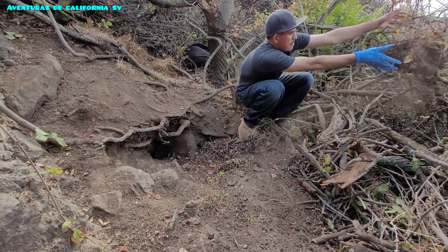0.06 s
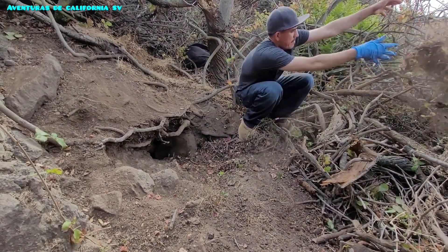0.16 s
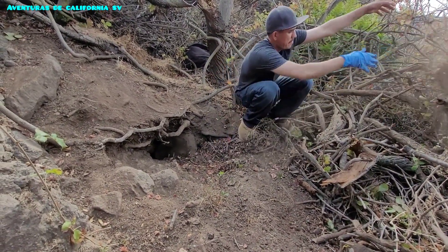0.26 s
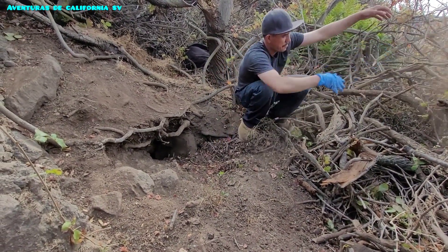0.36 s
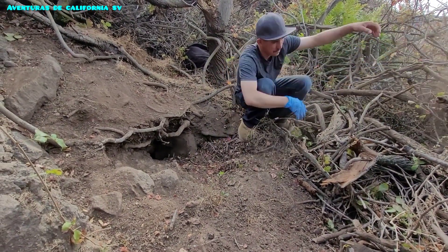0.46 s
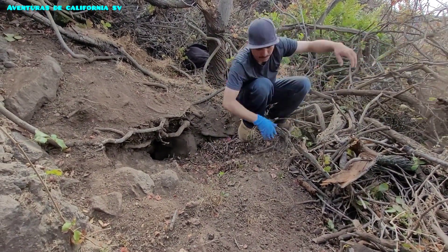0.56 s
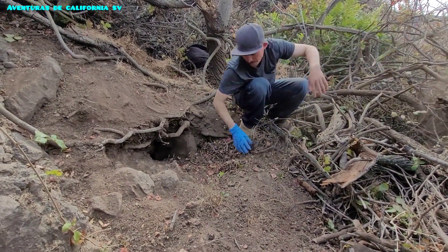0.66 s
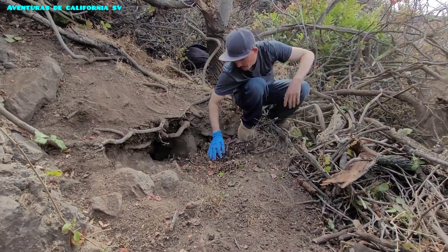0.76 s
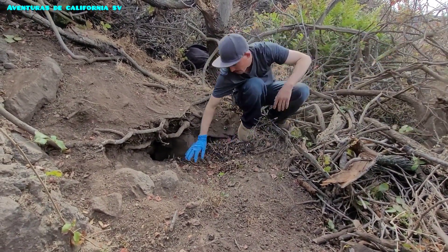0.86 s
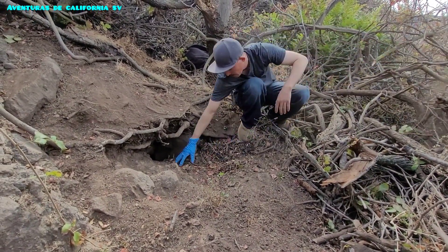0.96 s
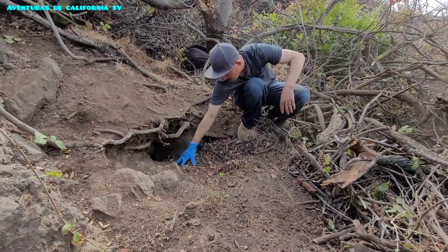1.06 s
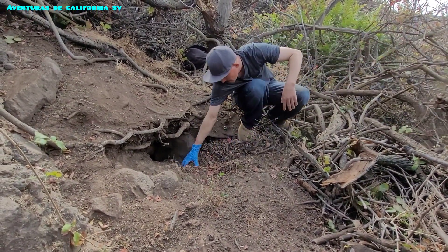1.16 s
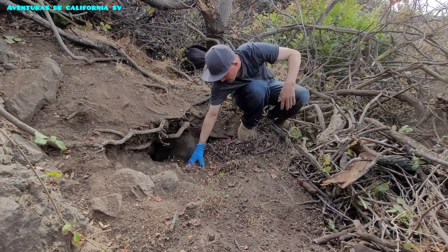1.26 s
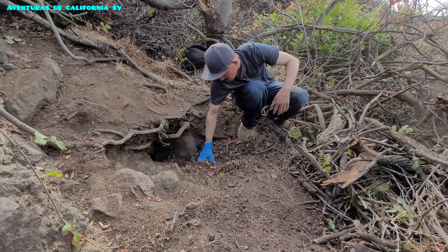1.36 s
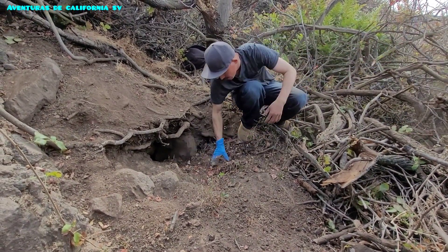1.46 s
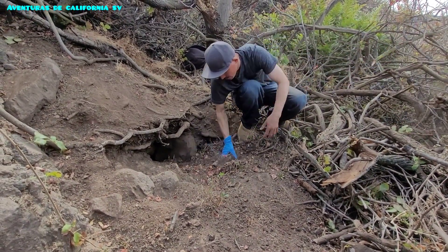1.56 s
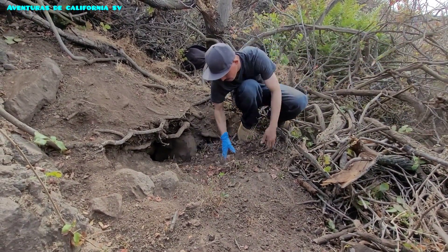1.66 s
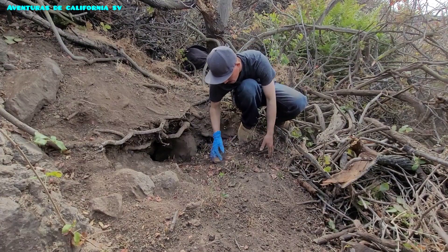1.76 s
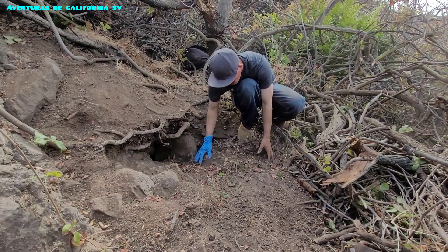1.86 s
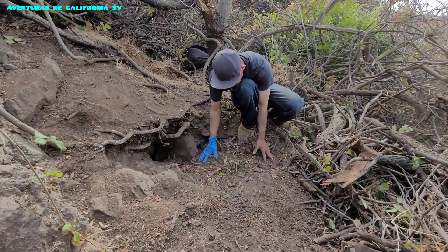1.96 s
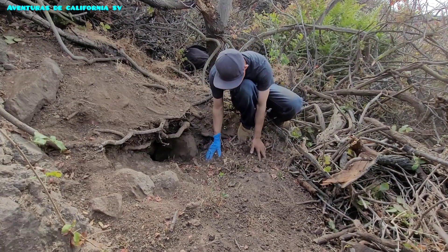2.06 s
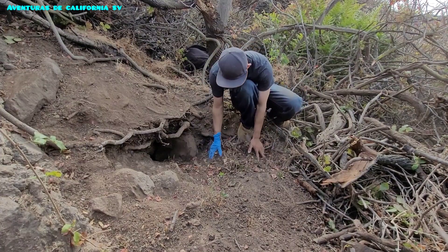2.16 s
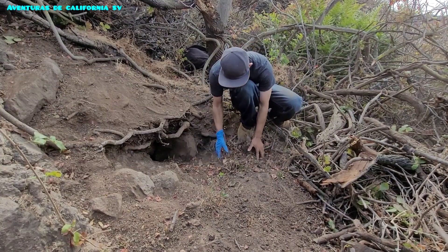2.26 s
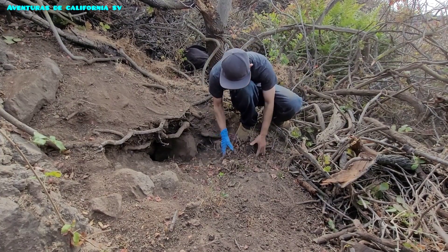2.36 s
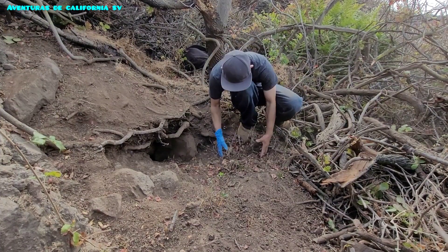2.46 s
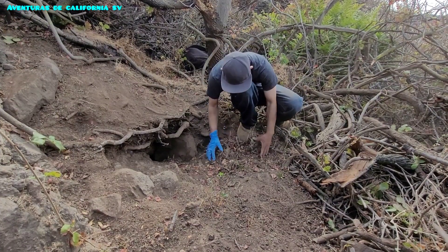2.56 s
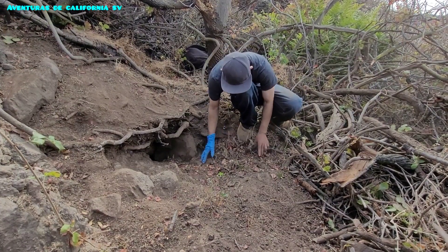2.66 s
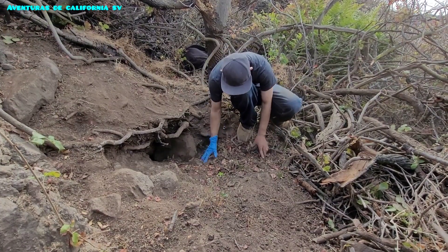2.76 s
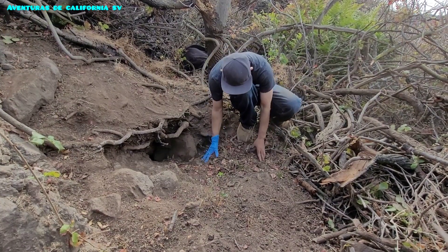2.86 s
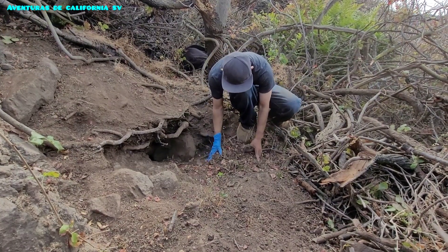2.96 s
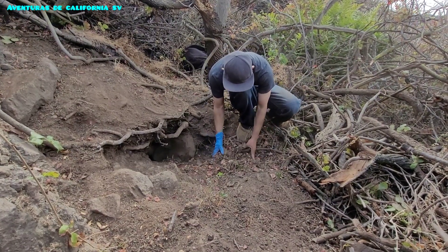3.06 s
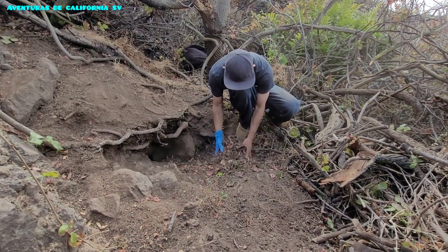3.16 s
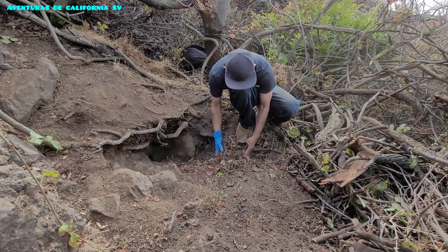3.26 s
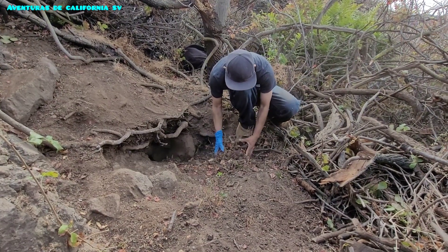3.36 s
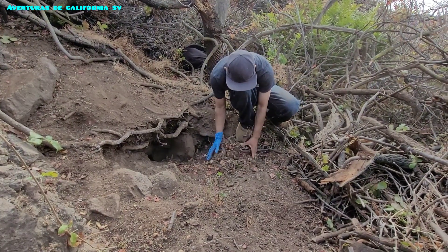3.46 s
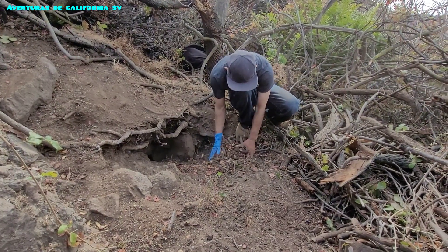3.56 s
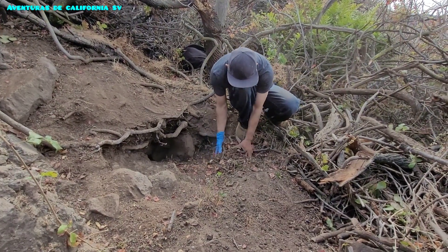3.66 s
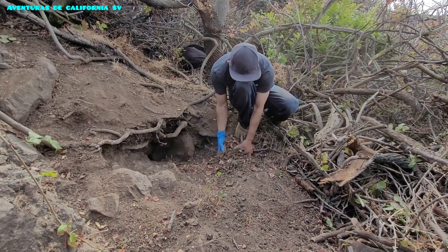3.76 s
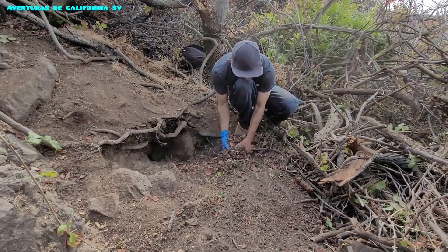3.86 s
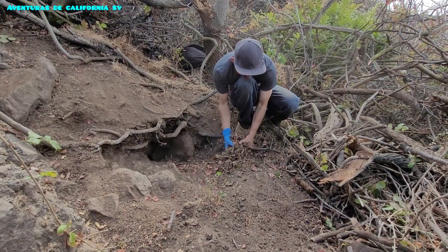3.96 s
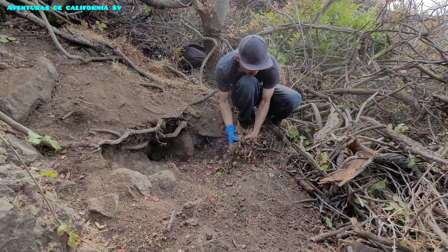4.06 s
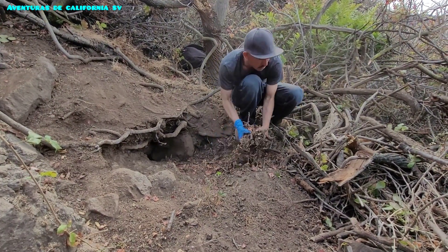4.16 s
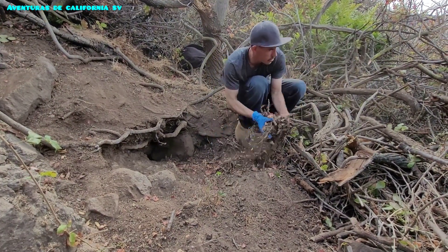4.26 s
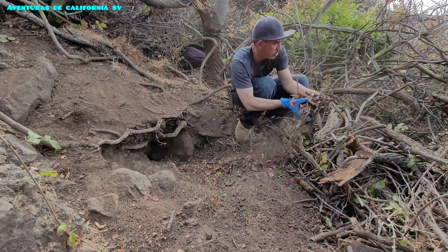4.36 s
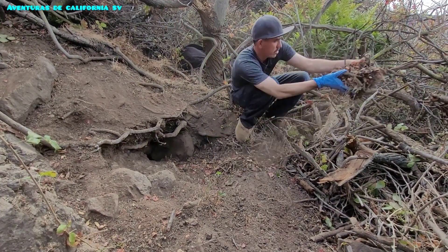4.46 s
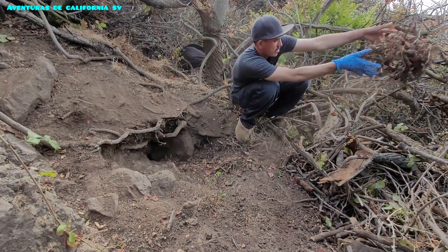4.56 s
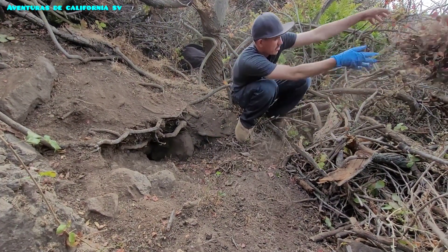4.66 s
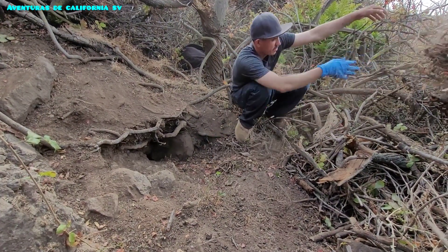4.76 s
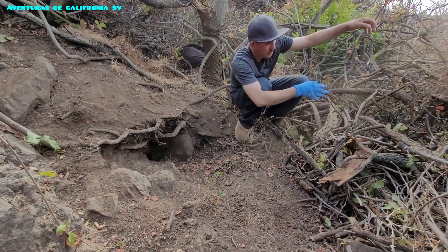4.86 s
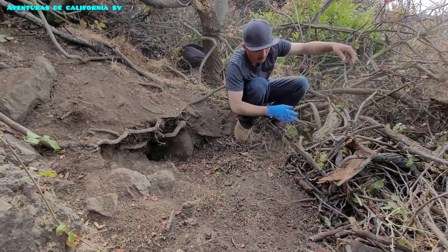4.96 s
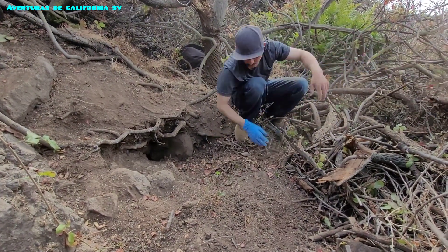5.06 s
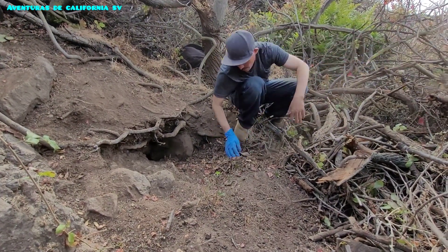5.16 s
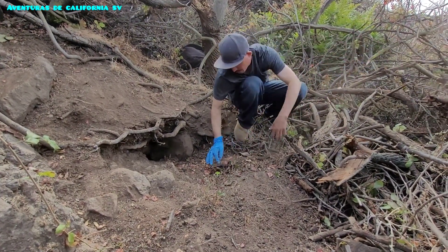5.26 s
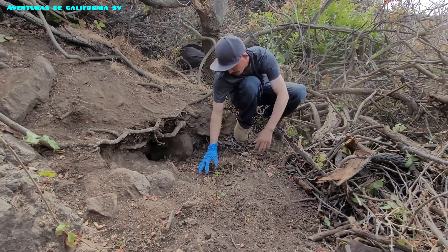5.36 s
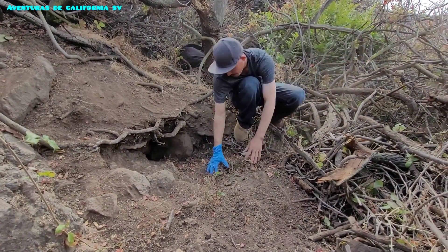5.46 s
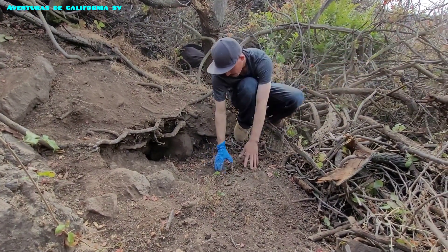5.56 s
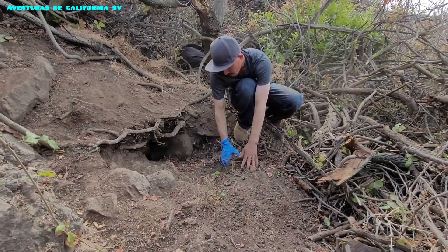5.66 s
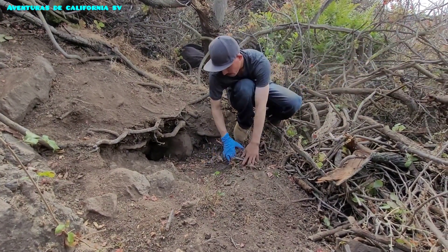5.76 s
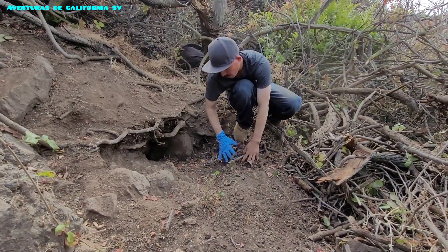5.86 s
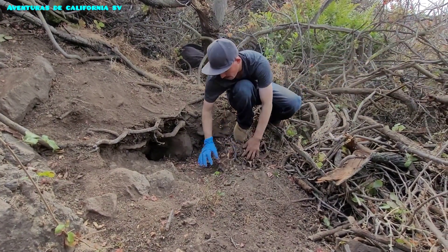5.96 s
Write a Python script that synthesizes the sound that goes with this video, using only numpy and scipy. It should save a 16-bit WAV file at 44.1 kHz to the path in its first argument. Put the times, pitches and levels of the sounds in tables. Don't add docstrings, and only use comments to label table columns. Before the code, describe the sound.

A shower of dirt and sticks clatters into brush on the right, hollow knocks on branches fading into trickling grit. Gloved hands then rake dry leaves and twigs in short crackling strokes with sharp snaps. Another load is tossed, rattling and snapping on the right before thinning to grit. Close stereo outdoors, with faint hiss and a distant engine drone.

```python
import sys
import numpy as np
from scipy import signal
from scipy.fft import rfft, irfft, next_fast_len
from scipy.io import wavfile
from scipy.ndimage import map_coordinates

SR = 44100
rng = np.random.default_rng(int(sys.argv[2]) if len(sys.argv) > 2 else 0)


def makeup_ratio(level_db):
    decades = np.asarray(level_db, float) / 20
    return 10 ** decades


def generate_wav(signal):
    frames = np.transpose(np.atleast_2d(signal))
    scaled = np.clip(frames, -1, 1) * 32767
    pcm = np.round(scaled).astype(np.int16)
    wavfile.write(sys.argv[1], SR, pcm)


N = 265482
TIME = np.arange(N) / SR


def unit(x):
    return x / np.sqrt(np.mean(x ** 2) + 1e-20)


def along(points, hz):
    point_hz, value = np.transpose(points)
    return np.interp(np.log(hz + 1), np.log(point_hz + 1), value)


def wobble(rate_hz):
    knots = rng.standard_normal(int(N * rate_hz / SR) + 4)
    return map_coordinates(knots, [TIME * rate_hz])


def filtered(x, response):
    size = next_fast_len(N + 8192)
    hz = np.fft.rfftfreq(size, 1 / SR)
    return irfft(rfft(x, size) * response(hz), size)[..., :N]


def coloured(x, spectrum):
    return unit(filtered(x, lambda hz: makeup_ratio(along(spectrum, hz))))


# [Hz, dB per Hz]
FIZZ_SPECTRUM = [(5000, -43.5), (7600, -1), (8600, -2), (12000, 1), (16000, 0)]
LEAF_SPECTRUM = [(1500, -18), (2500, -9), (3200, -2), (5000, 1), (7300, -2), (8600, -5.5), (12000, -26)]
TWIG_SPECTRUM = [(250, -60), (420, -4.5), (700, -1), (1200, 0), (2200, -0.5), (3000, -5.5), (4500, -18.5)]
SOIL_SPECTRUM = [(60, -28), (110, -9.5), (160, -5.5), (250, 3.5), (360, -6.5), (600, -32)]


def litter():
    fizz_db, leaf_db, twig_db, soil_db = motion()
    clump = wobble(14)
    fine = travel(grains(count=36000, spread_db=1.5, scatter=.9, alike=0.3376, life_s=0.0006158))
    coarse = travel(grains(count=14000, spread_db=0.0, scatter=.9, alike=0.97, life_s=0.00045))
    pebbles = unit(travel(ticks(count=1500, spread_db=2.0, pitch_hz=2685.8, cycles=3.007)))

    fizz_level = makeup_ratio(fizz_db + 0.7254 + 0.5446 * clump + 0.587 * wobble(45))
    leaf_level = makeup_ratio(leaf_db - 1.2877 + .5 * clump + 0.616 * wobble(40))
    twig_level = makeup_ratio(twig_db - 1.2 + .8 * clump + 1.1 * wobble(30))
    soil_level = makeup_ratio(soil_db + 1.237 * wobble(20))
    pebble_level = makeup_ratio((leaf_db + twig_db) / 2 - 9.5)

    fizz = fizz_level * coloured(fine + 0.6795 * coarse, FIZZ_SPECTRUM)
    leaf = leaf_level * coloured(fine + 0.1778 * coarse, LEAF_SPECTRUM)
    twig = twig_level * coloured(.05 * fine + coarse, TWIG_SPECTRUM)
    soil = soil_level * coloured(coarse + 0.15 * fine, SOIL_SPECTRUM)
    return fizz + leaf + twig + soil + pebble_level * pebbles


# start_s, hold_s, level_db, clod_weight_db, edge_s [s per 10 dB]
SHOWER_MOVES = [(0, 0.1028, -50.5, -9, 0.1818), (.135, .03, -51, -2, 0.0153), (.203, 0.00956, -48, -8, .02),
                (.277, 0.01666, -46.5, 9, .025), (.33, .025, -45, 1, .05), (.39, 0.01312, -39, 5, .04),
                (.43, .04, -37.5, -2, 0.0874), (4.62, .22, -56, -26, 0.2449),
                (4.817, 0.00468, -51, -18, .025), (4.868, .02, -43.5, -14, .015), (4.9, .03, -38, -1, .025),
                (4.95, .105, -35.5, -2, .055), (5.19, 0.01007, -50.5, 9, 0.0145),
                (5.31, 0.00951, -49, 3, 0.0354)]
# start_s, hold_s, level_db, soil_depth_db, edge_s [s per 10 dB]
RAKE_MOVES = [(1.42, .15, -60, 17, .1), (1.464, 0.12148, -47, -8, 0.1078),
              (1.86, 0.01408, -52.5, -4, 0.1854), (1.945, 0.00966, -48, -6, .03),
              (2.055, 0.02816, -46, -1, 0.1005), (2.13, 0.02111, -50.5, 9, 0.0731),
              (2.27, 0.03473, -50, 5.5, 0.0542), (2.33, 0.07545, -47.5, 3, 0.041),
              (2.52, .27, -61.5, -3, .2), (2.61, 0.01182, -54, -5, 0.0248),
              (2.72, 0.01654, -53.5, -3.5, 0.0485), (2.99, 0.04215, -51, 5.5, 0.073),
              (3.088, 0.03808, -44, -2, 0.0412), (3.16, 0.03374, -48.5, 8.5, 0.0471),
              (3.31, 0.0289, -58.5, -1.5, 0.1125), (3.5, 0.1083, -58.5, -5.5, 0.3363),
              (3.69, 0.0195, -49, 3, 0.0989), (3.88, 0.02245, -47.5, -6.5, 0.0798),
              (3.93, 0.02334, -50, -3, 0.0915), (4.03, 0.01754, -47, -9.5, 0.095),
              (4.11, .05, -55, -2.5, 0.1551), (4.23, .23, -51, -10, 0.1383), (4.5, 0.0183, -47, -14, .09),
              (5.53, .04, -55, 4, 0.1464)]
# start_s, hold_s, level_db, clod_weight_db, edge_s [s per 10 dB]
TRICKLE_MOVES = [
    (.55, .97, -44, 0, .22),
    (5.12, 0.7447, -45, 2.11, 0.4043),
]


def motion():
    rake_db, shower_db = (0, -3, -8, -15), (-0.5, 0.7124, -6.5, -19.5)
    trickle_db, rest_db = (-.6, .2, -4, -22), (-63, -68, -84, -95)
    depth_share, weight_share = (0, -.05, .35, 1.01), (0, -.05, .8, 1.3)
    edge_share = (1.0736, 1.1192, 1.2988, 1.3054)
    rise_share = 0.78955
    kinds = (
        (RAKE_MOVES, rake_db, depth_share, 0),
        (SHOWER_MOVES, shower_db, weight_share, 0),
        (TRICKLE_MOVES, trickle_db, weight_share, 4.5),
    )
    t = TIME[::64]
    power = makeup_ratio(rest_db)[:, None] ** 2
    for moves, mix_db, share, thins_db in kinds:
        for start_s, hold_s, level_db, depth_db, edge_s in moves:
            before_s = np.maximum((start_s - t) / rise_share, 0)
            after_s = np.maximum(t - start_s - hold_s, 0)
            layer_db = np.add(mix_db, depth_db * np.array(share))[:, None]
            top_db = level_db + layer_db - thins_db * abs(t - start_s)
            drop_db = 10 * np.outer(edge_share, before_s + after_s) / edge_s
            power = power + makeup_ratio(top_db - drop_db) ** 2
    return [np.interp(TIME, t, 10 * np.log10(p)) for p in power]


def grains(count, spread_db, scatter, alike, life_s):
    start = rng.integers(0, N, count)
    size = makeup_ratio(spread_db * np.minimum(rng.exponential(1, count), 4.5))[:, None]
    lag = scatter * rng.standard_normal(count)
    life = life_s * SR * np.exp(.5 * rng.standard_normal((count, 1)))
    fade = size * np.exp(-np.arange(64) / life)
    burst, own = rng.standard_normal((2, count, 64))
    left = fade * (alike * burst + np.sqrt(1 - alike ** 2) * own)
    return placed(start, lag, left, fade * burst, rng.random(count))


def ticks(count, spread_db, pitch_hz, cycles):
    start = rng.integers(0, N, count)
    draw = rng.standard_normal((count, 3, 1))
    size = makeup_ratio(spread_db * np.minimum(rng.exponential(1, (count, 1)), 4.5))
    turns = pitch_hz * np.exp(0.2789 * draw[:, 0]) * np.arange(256) / SR
    fade = np.exp(-turns / cycles) * (1 - np.exp(-turns / 0.8036))
    ring = size * np.sin(2 * np.pi * turns) * fade
    return placed(start, 1.1 * draw[:, 1, 0], ring * makeup_ratio(0.73 * draw[:, 2]), ring, rng.random(count))


# start_s, peak_db, centre_hz, splinter_tail_db
HAND_CRACKS = [(1.4636, -33, 5188, -11), (1.581, -30, 7666, -1.5), (1.5926, -32, 7842, -10),
               (1.9465, -34.5, 14300, -11), (2.0904, -32, 9965, -4.5), (2.1346, -37, 11110, -11),
               (2.35, -20, 10900, -3.5), (2.4038, -31, 13400, -8), (2.7134, -36.5, 12400, -7),
               (2.9964, -37.5, 11800, -10), (3.0885, -29, 13500, 6), (3.1835, -29, 7631, -5.5),
               (3.3113, -42, 6940, -3), (3.3554, -44, 7280, -2.5), (3.6889, -31, 9000, -7),
               (3.864, -42, 5240, -3), (3.95, -27, 8500, 4), (4.0168, -38, 5198, -2.5),
               (4.2115, -35, 6500, -11), (4.4965, -38, 5180, -10.5), (4.516, -37, 5196, -11),
               (4.1534, -43, 11600, -11), (4.647, -40.5, 7812, -6.5)]
# start_s, peak_db, centre_hz, splinter_tail_db
BRUSH_CRACKS = [(.0397, -30.5, 5200, -9), (.0841, -33, 6500, -9), (.1286, -36, 3152, 1),
                (.2018, -28, 5000, 3), (0.2309, -40, 3340, -12), (0.2504, -36, 6460, 0),
                (0.3302, -31, 4360, -17.5), (.356, -30, 2471, -5), (.424, -30.5, 2502, -9),
                (.4593, -28.5, 2204, -13), (.707, -37, 2584, -16.5), (0.7649, -43, 2658, -14),
                (4.5854, -42, 3340, -4), (4.605, -42, 4190, -9), (4.7407, -39, 4516, 0),
                (4.8116, -39, 4852, -3), (4.8166, -33.5, 4136, -5.5), (4.8506, -44, 2917, -8),
                (4.864, -20, 14000, 2), (4.8863, -38, 12700, -8.5), (4.8959, -24.5, 5475, 3.5),
                (4.918, -29.5, 2339, -6), (4.9338, -28.5, 2516, -15), (4.9541, -25.5, 4670, 2),
                (4.971, -24.5, 2765, -13.5), (4.9748, -22, 1900, 2.5), (5.058, -31.5, 3470, -20.5),
                (5.212, -37.5, 1859, -7.5), (5.3451, -33, 3541, 0), (5.673, -41, 2472, -10)]


def snaps():
    start_s, peak_db, hz, tail_db = np.transpose(HAND_CRACKS + BRUSH_CRACKS)[:, :, None]
    t = np.arange(1024) / SR
    draw = rng.standard_normal((len(start_s), 3, len(t)))
    low = np.minimum(hz / 5000, 1)
    width = np.repeat([.72, .65], [len(HAND_CRACKS), len(BRUSH_CRACKS)])[:, None]
    width = np.clip(width * (hz / 6000) ** 0.5666, .1, 3)
    pan_db = 2 * draw[:, 0, :1]

    splinters = makeup_ratio(tail_db - 4) * np.exp(-t / .004)
    fade = (1 - np.exp(-t / .00015)) * (np.exp(-t / .0005 * low) + splinters)
    f = np.fft.rfftfreq(len(t), 1 / SR) + 1
    band = np.exp(-(np.log(f / hz) / width) ** 2)[:, None]
    noise = irfft(rfft(draw) * band, len(t))
    left = noise[:, 0] + .8 * noise[:, 1]
    right = noise[:, 0] + .8 * noise[:, 2]
    crack = fade * np.array([left, right])
    crack = crack / np.abs(crack).max(axis=2, keepdims=True)
    crack = crack * makeup_ratio(peak_db + 6.0 + 4.072 * np.log(low))
    start = (start_s[:, 0] * SR).astype(int)
    return placed(start, 0 * start, crack[0] * makeup_ratio(pan_db / 2), crack[1] * makeup_ratio(-pan_db / 2), .5)


# start_s, peak_db, pitch_hz
BRANCH_KNOCKS = [(0.042, -57.5, 1480), (0.097, -42.5, 1486), (0.128, -41, 1000), (0.158, -38, 689),
                 (0.276, -29, 640), (0.358, -37, 778), (0.388, -23, 672), (0.393, -19.5, 834),
                 (0.396, -19, 734.3), (0.458, -51, 476), (1.995, -48.5, 678.2), (3.235, -49.5, 1370),
                 (3.95, -51, 1042), (4.506, -43.5, 1500), (4.816, -37, 1800), (4.913, -35, 680),
                 (4.941, -35.5, 580), (4.974, -31.5, 698.8), (5.189, -38.5, 775.5), (5.312, -33, 725.4),
                 (5.502, -42.5, 718.5)]
# pitch_hz, level_db
BRANCH_MODES = [(236, -2), (440, 3), (612, -3), (780, 4.5), (1054, 5), (1400, -2), (1900, 5)]


def knocks():
    start_s, peak_db, hz = np.transpose(BRANCH_KNOCKS)[:, :, None]
    t = np.arange(1300) / SR
    draw = rng.standard_normal((len(start_s), len(BRANCH_MODES), 2, 1))
    ring = 0
    for k, (mode_hz, mode_db) in enumerate(BRANCH_MODES):
        level_db = mode_db + 4.068 * draw[:, k, 1] - 7 * np.log(mode_hz / hz) ** 2
        pitch_hz = mode_hz * np.exp(0.05235 * draw[:, k, 0])
        ring = ring + (-1) ** k * makeup_ratio(level_db) * np.sin(2 * np.pi * pitch_hz * t)
    ring = ring * (1 - np.exp(-t / .0004)) * np.exp(-t / .0038)
    ring = ring / np.abs(ring).max(axis=1, keepdims=True) * makeup_ratio(peak_db + 2.5)
    start = (start_s[:, 0] * SR).astype(int)
    return placed(start, 0 * start, ring, ring, .5)


# start_s, peak_db
SOIL_THUMPS = [(1.0, -74.5), (1.42, -56.5), (1.66, -62.5), (2.03, -61), (2.28, -68.5), (2.76, -62.5),
               (3.05, -66.5), (3.72, -68.5), (4.3, -67.5), (5.05, -67.5)]


def thumps():
    start_s, peak_db = np.transpose(SOIL_THUMPS)[:, :, None]
    t = np.arange(5000) / SR
    swell = np.sin(np.pi * t / t[-1]) ** 2
    push = makeup_ratio(peak_db) * np.sin(2 * np.pi * 48 * t * (1 - 0.672 * t)) * swell
    start = (start_s[:, 0] * SR).astype(int)
    return placed(start, 0 * start, 0.2766 * push, push, 1)


# start_s, share [0-1]
THROWN_SHARE = [(0, 0.86), (.5, 1), (1.3, 0.93), (1.45, 0.47), (1.75, 0.58), (1.9, 0.04), (4.45, 0.03),
                (4.8, 0.96), (5.4, 0.94), (5.55, 0.69), (6.02, 0.63)]


def placed(start, lag, left, right, chance):
    thrown = chance < np.interp(start / SR, *np.transpose(THROWN_SHARE))
    row = N + SR
    at = start[:, None] + np.arange(left.shape[1]) + thrown[:, None] * row
    wide_lag = lag * (1 + 1.2 * thrown)
    late = np.clip(at + np.round(wide_lag).astype(int)[:, None], 0, None)
    pair = []
    for index, sound in ((late, left), (at, right)):
        summed = np.bincount(index.ravel(), sound.ravel(), 2 * row)
        pair.append(summed.reshape(2, -1)[:, :N])
    return np.stack(pair, axis=1)


# arrival_ms, level_db, ground_echo_ms, echo_share [0-1]
CAPSULE_PATHS = [
    [(0, 0.1, 1.545, 0.26), (.015, -1.2, 1.924, 0.48)],
    [(0.392, -0.4, 1.4, 0.27), (0.024, 0.4, 1.6, 0.16)],
]


def travel(places):
    late_ms, level_db, echo_ms, share = np.transpose(CAPSULE_PATHS, (2, 0, 1))[..., None]

    def delay(hz, ms):
        return np.exp(-2j * np.pi * hz * ms / 1000)

    def path(hz):
        echo = share * delay(hz, echo_ms) / (1 + (hz / 2600) ** 2)
        return makeup_ratio(level_db) * delay(hz, late_ms) * (1 + echo)

    return filtered(places, path).sum(axis=0)


# [Hz, dB per Hz]
AIR_SPECTRUM = [(15, -37.5), (25, -22), (64, 6), (130, -10.5), (363, -22.5), (641, -5.5), (796, -15.5),
                (1020, -7), (2050, -15.5), (2280, -21), (5140, -8), (9070, -14.5), (14800, -11.5),
                (16000, -11.5)]
# pitch_hz, likeness [0-1]
AIR_LIKENESS = [(60, 0.9743), (150, .85), (330, 0.12), (1500, 0), (5000, 0.0227)]


def outdoors():
    def mid_side(hz):
        angle = np.arccos(np.clip(along(AIR_LIKENESS, hz), -1, 1)) / 2
        return makeup_ratio(along(AIR_SPECTRUM, hz)) * [np.cos(angle), np.sin(angle)]

    mid, side = filtered(rng.standard_normal((2, N)), mid_side)
    hiss = makeup_ratio(-60 + 0.94 * wobble(2.535)) * unit(np.array([mid + side, mid - side]))
    engine_hz = 64.3 + 1.6 * wobble(9)
    drone = makeup_ratio(-66.5 + 2.4 * wobble(11)) * np.sin(2 * np.pi * np.cumsum(engine_hz) / SR)
    return hiss + drone


def scene():
    return litter() + travel(snaps() + knocks() + thumps()) + outdoors()


def top_cut(x):
    return signal.sosfilt(signal.butter(12, 17070, fs=SR, output="sos"), x)


# pitch_hz, level_db
MIC_COLOUR = [(100, -2), (4500, -0.5), (5800, -1), (7500, -1), (8400, -4.5), (9000, -5), (10500, -1),
              (12000, 1), (15500, -1)]


def record(dry):
    mix = filtered(dry, lambda hz: makeup_ratio(along(MIC_COLOUR, hz) - 62 * (hz > 15900)))
    return top_cut(mix)


dry = scene()
out = record(dry)
generate_wav(out)
```